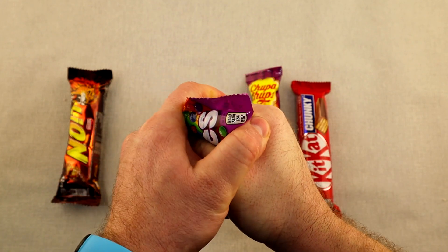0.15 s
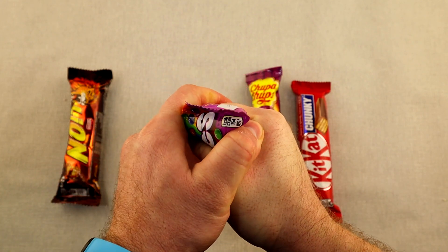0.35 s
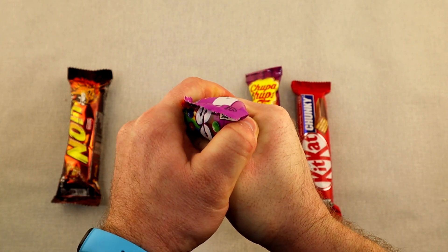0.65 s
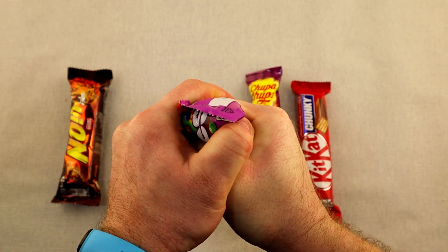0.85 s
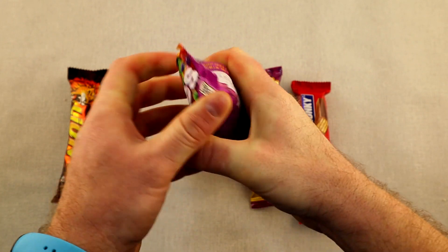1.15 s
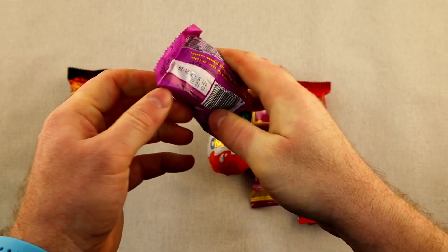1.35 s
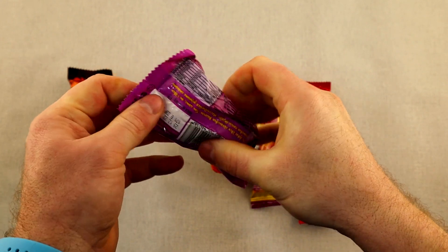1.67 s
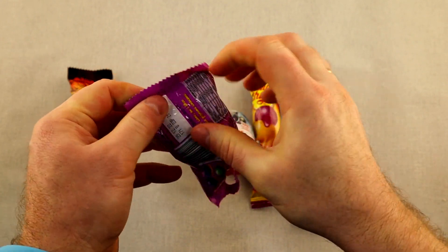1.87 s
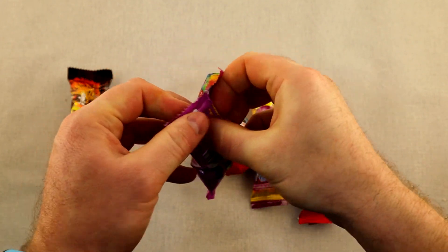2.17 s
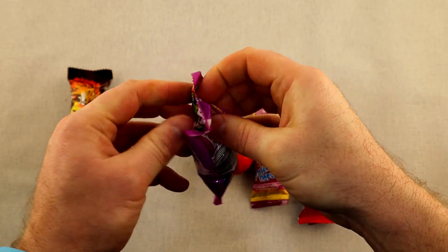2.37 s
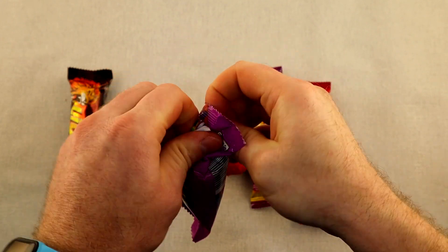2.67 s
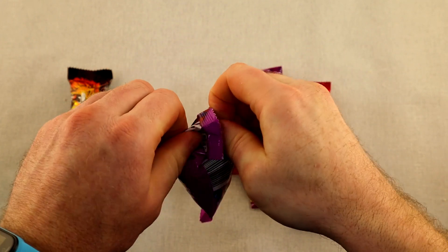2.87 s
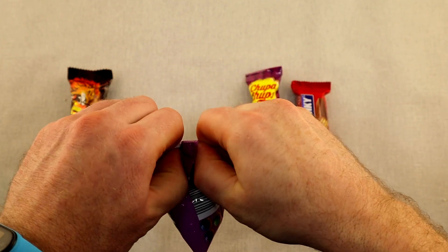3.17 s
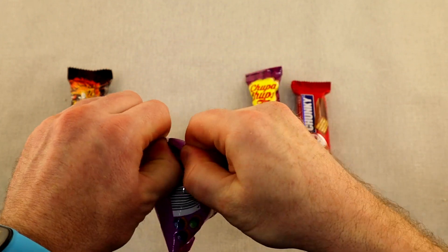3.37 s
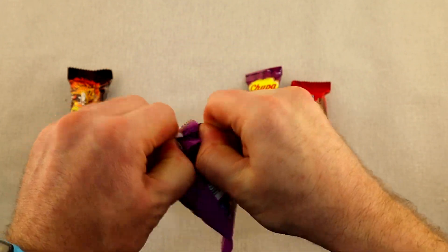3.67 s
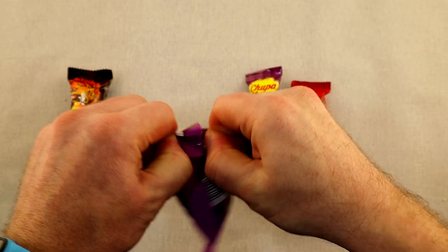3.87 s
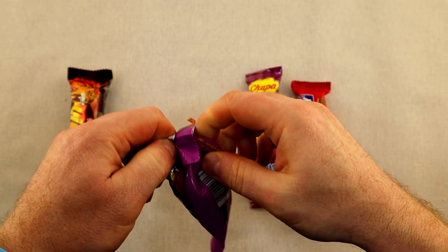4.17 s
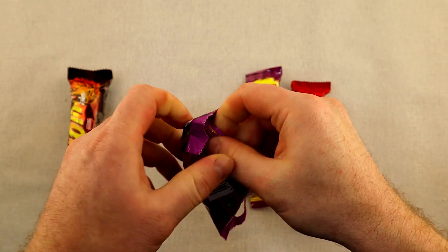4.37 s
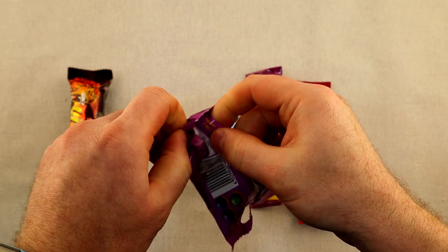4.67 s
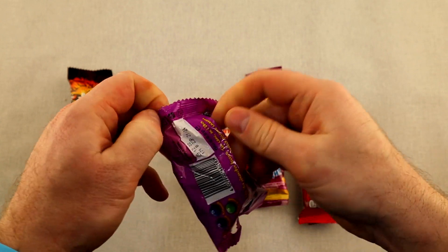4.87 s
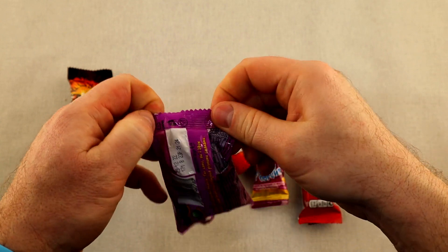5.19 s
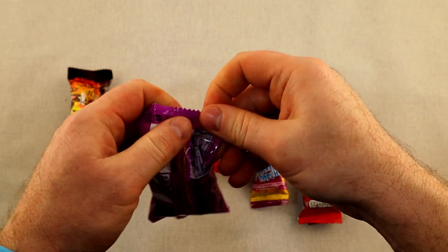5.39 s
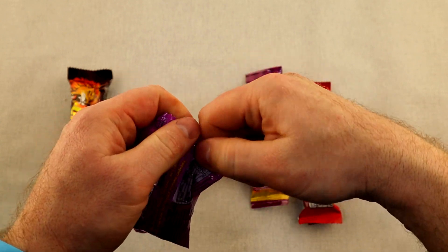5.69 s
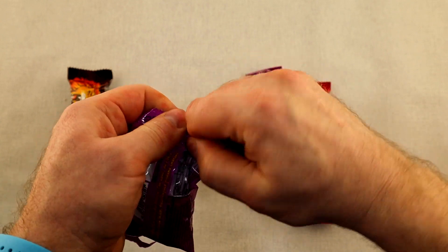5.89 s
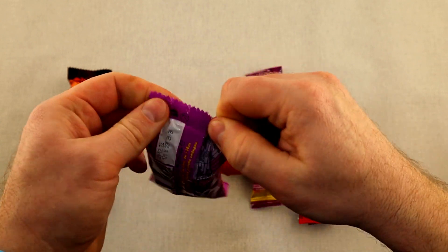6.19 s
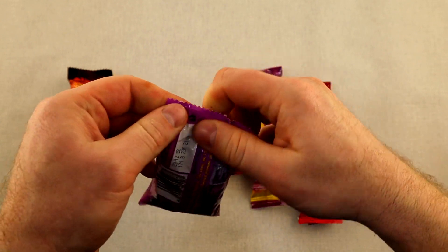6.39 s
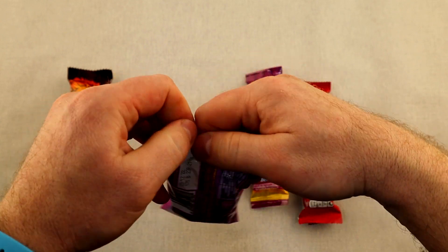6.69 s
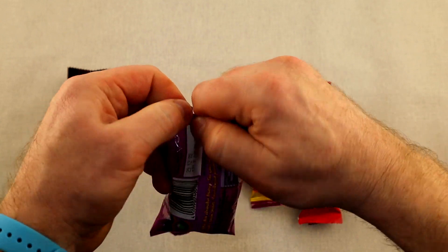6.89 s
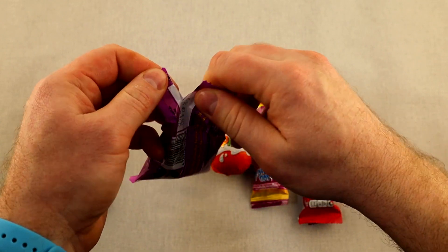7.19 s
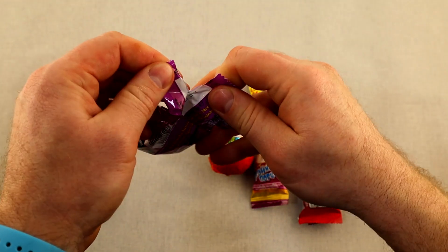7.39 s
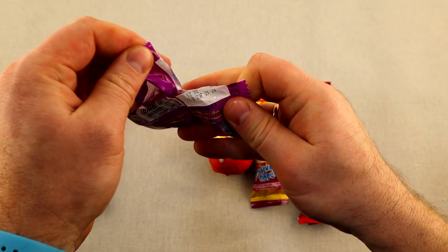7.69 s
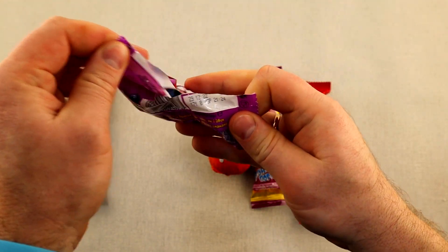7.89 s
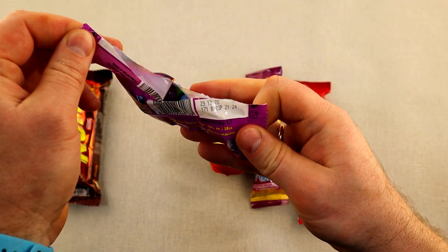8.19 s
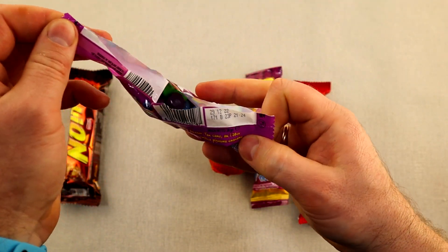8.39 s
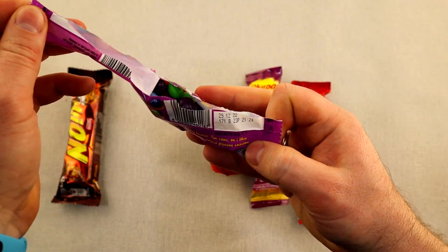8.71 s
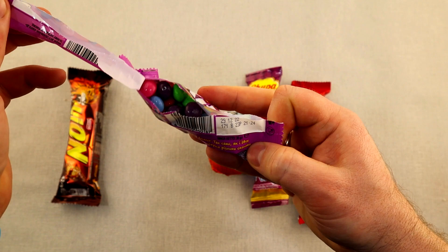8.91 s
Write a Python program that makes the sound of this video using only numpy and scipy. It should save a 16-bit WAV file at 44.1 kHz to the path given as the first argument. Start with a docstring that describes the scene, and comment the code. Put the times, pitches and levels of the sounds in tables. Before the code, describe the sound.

Thin plastic packaging crinkles close by in a small quiet room. It begins almost still, then breaks into busy squeezes: single crisp snaps, each wrapped in a fine flurry of ticks and rustle. Short gaps separate the bursts. Fingers bump the bag with short hollow pops falling in pitch. The pulling goes on until about eight seconds, then the crackle eases to scattered light ticks over faint room tone.

```python
"""A plastic sweet bag crackles close by as two hands knead it over a cloth-covered table and pull its seam open.
Large creases buckle in single snaps; each squeeze drives a fine crackle of many small flips of film.
Fingers bump the filled bag and its wall pops, as short low rings that fall in pitch.
Table, bag and hands scatter each snap at once; behind lie a small diffuse room, still air, a rumble and a faint drone."""
import sys
import numpy as np
from scipy import signal
from scipy.fft import rfft, irfft
from scipy.io import wavfile
from scipy.ndimage import uniform_filter1d

SR = 44100
rng = np.random.default_rng(int(sys.argv[2]) if len(sys.argv) > 2 else 0)


def unload_wav(signal):
    """Save mono or channel-first audio to the path in sys.argv[1] as 16-bit WAV at rate SR, clipped to [-1, 1]."""
    wavfile.write(
        sys.argv[1],
        SR,
        np.round(np.clip(np.atleast_2d(signal).T, -1, 1) * 32767).astype(np.int16),
    )


N = 399105  # length [samples]
TAPS = 2048  # length of one click [samples]
TIME, HZ = np.arange(N) / SR, np.fft.rfftfreq(TAPS, 1 / SR)


def amp(db):
    """Turns decibels into gain."""
    return 10 ** (np.asarray(db) / 20)


def unit(x):
    """Scales a signal to rms 1."""
    return x / np.sqrt(np.mean(x ** 2) + 1e-20)


def read(points, hz):
    """Reads a curve of (frequency, value) points on a log-frequency axis."""
    point_hz, value = np.transpose(points)
    return np.interp(np.log(hz + 1), np.log(point_hz + 1), value)


def curve(points):
    """Reads a curve of (time, value) points at every sample."""
    return np.interp(TIME, *np.transpose(points))


def add(mix, s, sound):
    """Lays a sound of several channels into the mix at time s."""
    part = mix[:, max(round(s * SR), 0):][:, :sound.shape[1]]
    part += sound[:, :part.shape[1]]


# Large creases that snap: (time [s], middle-band rms target over 9 ms [dB], treble relative to it [dB])
CREASE_SNAPS = [(0.001, -27.5, -6.5), (0.302, -36.5, 9.5), (0.325, -41.0, -11), (0.355, -43.0, -10),
                (0.413, -47.5, -3.5), (0.737, -47.0, 2.5), (1.043, -26.0, -3), (1.214, -21, -10),
                (1.368, -19.5, -8.5), (1.411, -29, 5), (1.438, -24, -10), (1.532, -22, 2.5),
                (1.647, -15.0, -8), (1.661, -19.0, 1.5), (1.826, -27, -5), (1.975, -27, 3.5),
                (2.031, -20.0, -6.5), (2.078, -21.0, -1), (2.143, -23.5, 2), (2.166, -23, 5),
                (2.232, -19.5, -6.5), (2.253, -23.5, -5), (2.302, -20.5, 4), (2.474, -20.5, -7),
                (2.545, -21, -7), (2.606, -20, 4), (2.659, -21.5, -12), (2.694, -21.5, -12),
                (2.767, -31.0, -4), (2.809, -24.5, -1), (2.862, -26, 2), (2.916, -32, 2.5),
                (2.946, -28.5, -11.5), (2.964, -30, -23), (2.992, -37, 10.5), (3.027, -29, -10),
                (3.075, -24.5, -7.5), (3.142, -28, -29.5), (3.161, -30.5, -14), (3.187, -26.5, -3.5),
                (3.219, -31, 7), (3.237, -32, 2), (3.28, -20, -2.5), (3.297, -32, 1), (3.316, -26, -3),
                (3.334, -29, 1.5), (3.385, -30.5, 4.5), (3.405, -18.5, -10), (3.431, -25.0, -1),
                (3.525, -27.5, -9), (3.536, -23.0, -2.5), (3.615, -23.5, -5), (3.724, -22, 3.5),
                (3.8, -18.5, -8), (4.081, -19.5, -6), (4.17, -29, -4), (4.309, -25.0, -8),
                (4.339, -21.5, 2.5), (4.379, -27.5, 7.5), (4.472, -27.5, 2), (4.721, -20, -0.5),
                (4.747, -28.5, 1.5), (4.797, -23.0, 7), (4.823, -17, -4.5), (4.85, -25.5, -10),
                (4.877, -27, -6), (4.973, -27.0, 3.5), (5.038, -27.5, -5.5), (5.084, -30.5, -1),
                (5.137, -29.5, -4), (5.154, -23.5, 3), (5.258, -32, -3), (5.276, -28, -2), (5.287, -31, 4),
                (5.536, -36, -4), (5.593, -31, -11), (5.621, -22.5, 1.5), (5.74, -24.0, 0),
                (5.866, -29.5, -3), (5.881, -29, -20), (5.902, -22, -21), (5.918, -25, 5),
                (5.934, -16, -13), (6.028, -25, -8), (6.078, -17.0, -5), (6.162, -22.0, 2.5),
                (6.181, -20.5, -6.5), (6.242, -23, 0.5), (6.309, -19.5, -5.5), (6.356, -29.5, -2),
                (6.464, -23.5, -4.5), (6.481, -28, 1.5), (6.591, -25, -5.5), (6.619, -31.5, 2),
                (6.695, -28, -2), (6.725, -26, 3.5), (6.823, -22.0, -6), (6.865, -27, -8), (6.911, -24, -2),
                (6.95, -17, -4.5), (6.982, -24.5, -16), (7.055, -21.5, -8.5), (7.125, -24.5, -10),
                (7.27, -36, 1), (7.326, -29.5, -3.5), (7.412, -21.5, -7), (7.544, -24.5, 1.5),
                (7.564, -25.5, -2), (7.703, -26.5, -9.5), (7.723, -28, 4), (7.77, -25.5, -14),
                (7.924, -35.5, 8), (7.956, -25.5, 8.5), (7.985, -25.5, 0.5), (8.175, -32.5, 1.5),
                (8.201, -30.5, 1), (8.218, -31, 8), (8.364, -24, 2), (8.388, -27, 7), (8.713, -33, -6.5),
                (8.743, -33.5, -4.5), (8.855, -33, 4), (9.04, -31.5, -23.5)]
# How freely the bag wall moves with a crease, low when pinched tight:
# (time [s], low-band level of a snap relative to its middle band [dB])
WALL_SLACK = [(0, -14), (0.3, -73), (0.75, -15.5), (2.16, -11), (2.8, -18.5), (3.42, -17.5), (3.54, -7),
              (5.0, -11.5), (5.65, -5.5), (6.03, -16.5), (6.28, -5.5), (6.65, -11.5), (6.88, -2),
              (7.2, -25.5), (7.45, -7)]


def snaps(before_db=-20.5, after_db=-12.0, apart_s=.009):
    """A large crease snaps, with a weaker click of like colour just before and after; a slack wall adds body."""
    out = np.zeros((3, N))
    for s, db, treble_db in CREASE_SNAPS:
        low_db = np.interp(s, *np.transpose(WALL_SLACK))
        band_db = db + np.array([low_db, 0, treble_db])
        early, late = rng.random(2) + .5
        weaker_click = buckle(band_db)
        add(out, s - .5 * apart_s * early, amp(before_db) * weaker_click)
        add(out, s, buckle(band_db))
        add(out, s + apart_s * late, amp(after_db) * weaker_click)
    return out


# Starting colour of the film, before each click's bands are balanced: (frequency [Hz], level per Hz [dB])
FILM_COLOUR = [(110, -32.5), (165, -17), (640, -7), (820, 0.5), (1100, -4.5), (1800, -2), (5000, -6),
               (12000, -10.5), (13500, -21.5), (16000, -31)]
# Borders of the bass, low, middle and treble bands of a click: (frequency [Hz])
CLICK_BANDS = [60, 300, 1300, 4500, 16000]
SNAP_S = .009  # window over which a click's level is reckoned [s]


def buckle(band_db, bass_db=-20.5, ripple_db=1.35, facet_db=4.5, facet_width=0.12, facet_hz=4660.0,
           facet_rise=0.38, stutter=0.54, stutter_s=.0007, count=2):
    """One facet of film flips: a stuttering click with brief resonances of its own and an uneven colour."""
    grain = uniform_filter1d(rng.standard_normal(len(HZ)), size=30)
    colour_db = read(FILM_COLOUR, HZ) + ripple_db * unit(uniform_filter1d(grain, size=20))

    # The smaller the facet, the brighter it snaps and the higher it rings; a neighbour rings at any pitch
    own_hz = facet_hz * amp(facet_rise * (band_db[2] - band_db[1]) + rng.standard_normal())
    neighbour_hz = 750 * 9 ** rng.random()
    for hz in own_hz, neighbour_hz:
        height_db = facet_db * np.sqrt(facet_hz / hz)  # low rings stand out most
        colour_db = colour_db + height_db / (1 + ((HZ - hz) / (facet_width * hz)) ** 2)

    # The fold catches and jumps on before it settles
    catches = np.cumsum(rng.exponential(stutter_s, count))
    signs = rng.choice([-1, 1], count)
    jumps = 1 + stutter * signs @ np.exp(-2j * np.pi * np.outer(catches, HZ))
    ways = jumps * paths()

    band_db = np.r_[band_db[0] + bass_db, band_db]  # thin film radiates little bass
    for _ in range(2):  # two passes bring the bands near their levels: large facets dark, small taut ones bright
        power = amp(colour_db) ** 2 * np.mean(abs(ways[:2]) ** 2, 0) * 2 / (TAPS * SNAP_S * SR)
        slope = []
        for lo, hi, db in zip(CLICK_BANDS, CLICK_BANDS[1:], band_db):
            present_db = 10 * np.log10(power[(HZ > lo) & (HZ < hi)].sum())
            slope.append((np.sqrt(lo * hi), db - present_db))
        colour_db = colour_db + read(slope, HZ)

    # Minimum phase: the click starts at once
    log_gain = np.log(amp(np.r_[colour_db, colour_db[-2:0:-1]]))
    causal = np.exp(np.conj(signal.hilbert(log_gain)))[:len(HZ)]
    return irfft(causal * ways)


def paths(table=0.67, table_s=0.003, scatter=1.0, scatter_s=.0022, linger=1.4, aim_s=.00004,
          spread_s=0.00018, count=30):
    """Ways to the left microphone, the right one and the room: direct, off the table, scattered by bag and hands."""
    # Most scattered sound comes at once, a little lingers
    late = scatter_s * (rng.random(count) * .97 + .03) ** (-1 / linger) - scatter_s
    delay = np.r_[0, table_s * rng.uniform(.75, 1.25), late]
    size = np.r_[1, table, scatter * rng.choice([-1, 1], count) / np.sqrt(count)]
    # Time difference between the microphones for each way
    lag = np.r_[aim_s * (rng.standard_normal(2) + .5), spread_s * rng.uniform(-1, 1, count)]
    arrival = spread_s + delay + np.array([-lag, lag]) / 2
    ears = (size[:, None] * np.exp(-2j * np.pi * arrival[..., None] * HZ)).sum(1)
    to_room = np.ones(len(HZ))
    return np.vstack([ears / np.linalg.norm(size), to_room])


def crackle(level_db, per_s, spread_db, low_db, high_db, vary_db, growth, follow, count=40):
    """Strain builds and small creases release it: the harder the film is worked, the more flip, and the louder."""
    flex_db = flex()
    rate = per_s * amp(growth * (flex_db - np.median(flex_db)))  # flips per second
    shapes = []
    for _ in range(count):
        band_db = np.array([low_db, 0, high_db]) + vary_db * rng.uniform(-0.24, 1, 3)
        shapes.append(unit(buckle(band_db)) * np.sqrt(SR / TAPS))

    wait, large, facet = rng.random((SR // 2, 3)).T
    moments = np.searchsorted(np.cumsum(rate) / SR, np.cumsum(2 * wait))
    size = unit(amp(spread_db * large ** 2)) * (-1) ** np.arange(len(large))
    work = amp(follow * flex_db + level_db) / np.sqrt(rate)  # shared out among the creases of each moment
    out = np.zeros((3, N))
    for at, gain, which in zip(moments[moments < N], size, facet):
        add(out, at / SR, gain * work[at] * shapes[int(which * count)])
    return out


# Between squeezes the film is held still, then turned over, then hangs open: (time [s], drive of the crackle [dB])
LIGHT_HANDLING = [(0.93, -70), (1.12, -39), (4.68, -46.5), (6.5, -48.5), (7.2, -42), (8.2, -52)]
# Fingers squeeze or pull the bag: (start time [s], length [s], drive of the crackle before build and sag [dB])
FINGER_SQUEEZES = [(0.2, 0.1, -55), (0.947, 0.17, -43.5), (1.124, 0.105, -24.5), (1.36, 0.21, -31),
                   (1.631, 0.058, -19.5), (1.694, 0.149, -33.0), (1.966, 0.165, -27.5), (2.137, 0.276, -24),
                   (2.453, 0.114, -24.5), (2.589, 0.11, -21.5), (2.89, 0.25, -38.5), (3.57, 0.17, -24.5),
                   (3.748, 0.234, -20.0), (3.983, 0.261, -29.0), (4.315, 0.084, -26.5),
                   (4.421, 0.184, -34.5), (4.785, 0.05, -21.5), (4.898, 0.17, -37.5), (5.3, 0.2, -35),
                   (5.973, 0.04, -31), (6.18, 0.14, -30.5), (6.658, 0.11, -34), (6.86, 0.29, -30),
                   (7.529, 0.05, -25.5), (7.736, 0.116, -33.5), (7.884, 0.183, -30.0), (8.36, 0.07, -30.5),
                   (8.539, 0.055, -37.5), (8.863, 0.04, -37), (9.0, 0.05, -36.5)]
PRESS_S, SAG_DB_PER_S, LET_GO_S = .025, 9., .02  # a squeeze builds, eases as the film yields, and lets go
FLURRY_DB, FLURRY_S = -14., .018  # every snap sets the creases around it crackling


def flex():
    """Drive of the fine crackle in dB: powers of light handling, squeezes and the flurry after each snap add up."""
    power = amp(curve(LIGHT_HANDLING)) ** 2
    for start, length, db in FINGER_SQUEEZES:
        during = slice(*np.searchsorted(TIME, [start, start + length + 10 * LET_GO_S]))
        t = TIME[during] - start
        press = np.minimum(t / PRESS_S, 1)
        let_go = np.exp(-np.maximum(t - length, 0) / LET_GO_S)
        power[during] += (amp(db - SAG_DB_PER_S * t) * press * let_go) ** 2
    for s, db, _ in CREASE_SNAPS:
        after = slice(*np.searchsorted(TIME, [s, s + 10 * FLURRY_S]))
        fade = np.exp(-(TIME[after] - s) / FLURRY_S)
        power[after] += (amp(db + FLURRY_DB) * fade) ** 2
    return 10 * np.log10(power)


# Tautness of the film: (time [s], treble gain of the crackle [dB])
FILM_TAUTNESS = [(1.03, 5), (1.35, -7), (2.35, -2), (3.7, -2.5), (4.65, -6.5), (8.3, -4.5)]
FIRM_DB = -36.  # film driven more lightly than this loses its edge


def stretched(x, split_hz=4200, dulling=0.12):
    """Taut film trades body for treble; handled less than firmly, it loses its edge."""
    body = signal.sosfiltfilt(signal.butter(1, split_hz, fs=SR, output="sos"), x)
    treble = x - body
    taut_db = curve(FILM_TAUTNESS)
    dull_db = dulling * np.minimum(flex() - FIRM_DB, 0)
    return body * amp(-.35 * taut_db) + treble * amp(taut_db + dull_db)


def slackened(x, split_hz=300.0, share=0.59):
    """A slack wall lends the fine crackle more body, a pinched one less."""
    body = signal.sosfilt(signal.butter(1, split_hz, fs=SR, output="sos"), x)
    slack_db = curve(WALL_SLACK)
    return x + body * (amp(share * (slack_db - np.median(slack_db))) - 1)


# Finger bumps on the bag and hollow pops of its wall:
# (time [s], envelope peak before scuffing and low cut [dB], pitch it settles towards [Hz])
BAG_BUMPS = [(0.894, -43.5, 332.7), (1.25, -29.5, 508), (1.4, -30.5, 397), (2.481, -14.5, 780),
             (3.24, -26, 665), (4.166, -37, 383), (5.78, -36, 230), (5.899, -22, 870), (6.001, -23, 840),
             (6.306, -24, 520), (7.412, -28, 886), (7.494, -23.5, 840), (7.9, -23, 865), (8.743, -33, 356),
             (8.89, -39, 260), (8.892, -27, 790)]


def bumps(rise_cycles=0.45, t60=0.06, rough=0.39, scuff=0.51, lowest_hz=156.0, glide=0.33, glide_s=0.0035):
    """A pushed bag answers with a short, scuffing low ring that drops in pitch as the wall relaxes."""
    out, t = np.zeros((1, N)), np.arange(SR // 6) / SR
    for s, db, hz in BAG_BUMPS:
        decay = amp(-60 * t / t60 * hz / 400)  # t60 holds at 400 Hz; high rings die sooner
        swell = (1 - np.exp(-t * hz / rise_cycles)) ** 2 * decay
        rub = unit(uniform_filter1d(rng.standard_normal(len(t)), size=70)) * hz / 400  # high rings wobble more
        turns = hz * np.cumsum(1 + glide * np.exp(-t / glide_s)) / SR
        ring = np.sin(2 * np.pi * turns + rough * rub) * (1 + scuff * unit(rub[::-1]))
        add(out, s, amp(db) * (swell / swell.max() * ring)[None])
    return signal.sosfilt(signal.butter(2, lowest_hz, "high", fs=SR, output="sos"), out)


# Room ring: (frequency [Hz], 60 dB decay time [s])
ROOM_RING = [(150, 0.21), (2300, 0.34), (14000, 0.3)]
# Room send: (frequency [Hz], level [dB])
ROOM_SEND = [(200, -4), (2300, -5), (14000, -17)]


def room(x, build_s=0.0012, turn_hz=4., count=2):
    """Diffuse tails last longest around 2300 Hz and die soonest in the bass; turning film throws sound other ways."""
    out = np.zeros((2, N))
    for k in range(count):
        noise = irfft(diffuse(size=SR // 2)[1])
        hz, t, z = signal.stft(noise, SR, nperseg=256)
        fade = amp(-60 * t / read(ROOM_RING, hz)[:, None]) * (1 - np.exp(-(t / build_s) ** 2))
        fade = fade / np.sqrt((fade ** 2).sum(1, keepdims=True) * t[1] * SR)  # equal energy at each frequency
        fade = fade * amp(read(ROOM_SEND, hz))[:, None]
        tail = signal.istft(z * fade, SR, nperseg=256)[1]
        facing = np.cos(2 * np.pi * turn_hz * TIME + np.pi * k / count)
        out += signal.fftconvolve((x * facing)[None], tail, axes=1)[:, :N]
    return out


# Likeness of the two microphones in a diffuse field: (frequency [Hz], correlation [0-1])
MICROPHONE_LIKENESS = [(400, 0.46), (1200, 0.43), (2500, 0)]


def diffuse(size):
    """Frequencies and spectra of white noise that reaches both microphones from all sides."""
    hz = np.fft.rfftfreq(size, 1 / SR)
    a, b = rfft(rng.standard_normal((2, size)))
    alike = np.clip(read(MICROPHONE_LIKENESS, hz), -1, 1)
    return hz, np.array([a, alike * a + np.sqrt(1 - alike ** 2) * b])


# Colour of the still room, before its overall level is set: (frequency [Hz], level per Hz [dB])
AIR_COLOUR = [(15, -16), (100, -19), (290, -11.5), (600, -20), (4000, -28.5), (16000, -40)]
# Swells added to the low drone: (time [s], level [dB])
DRONE_SWELLS = [(1.92, -48), (2.88, -51.5), (4.56, -54)]


def background(air_db=-59.5, rumble_db=-70.5, rumble_hz=37.0, rumble_width_hz=1.5,
               drone_db=-65.5, drone_hz=263.0, drone_width_hz=27.5, swell_s=0.16):
    """Shaped noise makes still air; narrow bands of noise make a deep rumble and a faint wavering, swelling drone."""
    hz, z = diffuse(size=N)
    air = amp(air_db) * unit(irfft(z * amp(read(AIR_COLOUR, hz)), N))
    rumble_band = 1 + ((hz - rumble_hz) / rumble_width_hz) ** 2
    rumble = amp(rumble_db) * unit(irfft(z[0] / rumble_band, N))
    drone_band = 1 + ((hz - drone_hz) / drone_width_hz) ** 2
    drone = unit(irfft(diffuse(size=N)[1][0] / drone_band, N))
    level = amp(drone_db) + sum(amp(db) * np.exp(-((TIME - s) / swell_s) ** 2) for s, db in DRONE_SWELLS)
    return air + rumble + drone * level


def scene(bump_room_db=1.0):
    """Snaps, separate ticks and a fine rustle from the bag, its close bumps, the room's answer, and the background."""
    ticks = crackle(level_db=-2.0, per_s=70., spread_db=15.5, low_db=-10.0, high_db=0.0,
                    vary_db=10.0, growth=.25, follow=0.95)
    # Even the finest creases differ in strength
    rustle = crackle(level_db=-4.5, per_s=330., spread_db=9., low_db=-9.5, high_db=-1.0,
                     vary_db=9.0, growth=.25, follow=1.077)
    left, right, outward = snaps() + slackened(stretched(ticks + rustle))
    knocks = bumps()[0]
    reverb = room(outward + amp(bump_room_db) * knocks)
    return np.array([left, right]) + knocks + reverb + background()


def record(dry, edge_hz=16200):
    """Clips at the recorder's full scale, then cuts the treble above its band limit."""
    held = np.clip(dry, -1, 1)
    band_limit = signal.firwin(255, edge_hz, window=("kaiser", 9), fs=SR)
    return signal.oaconvolve(held, band_limit[None], "same")


dry = scene()
out = record(dry)
unload_wav(out)
```